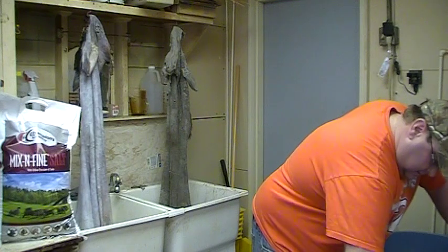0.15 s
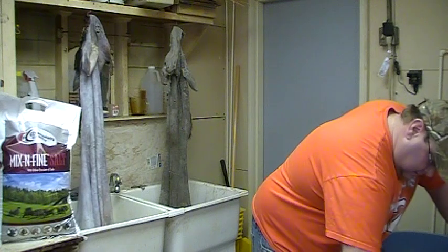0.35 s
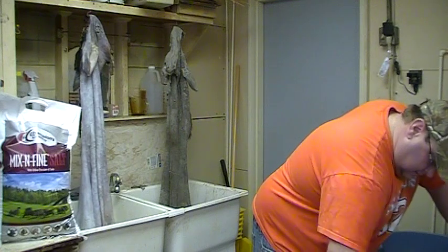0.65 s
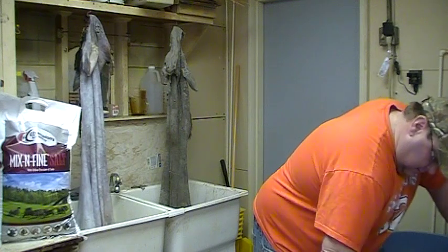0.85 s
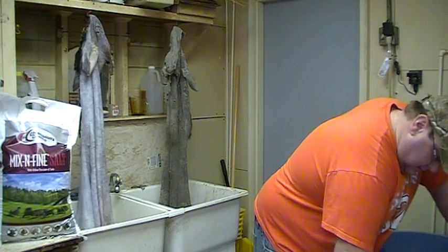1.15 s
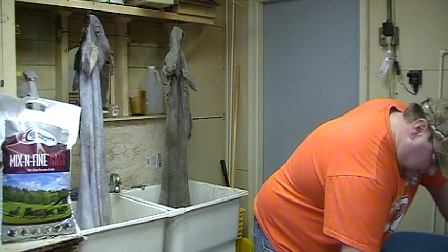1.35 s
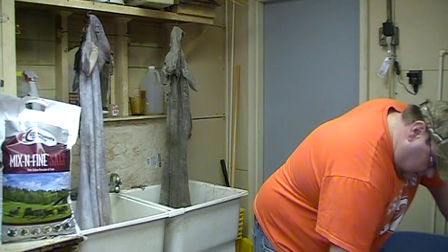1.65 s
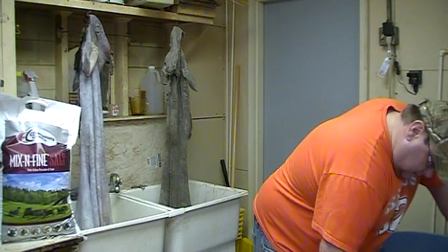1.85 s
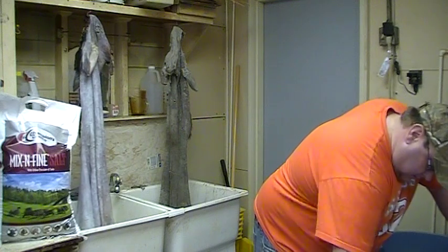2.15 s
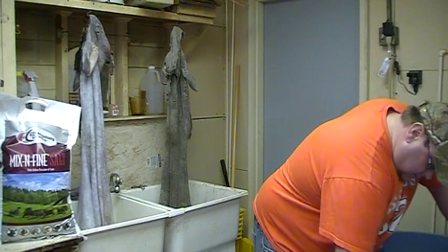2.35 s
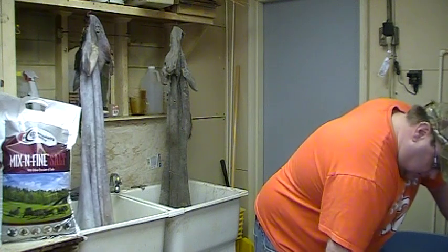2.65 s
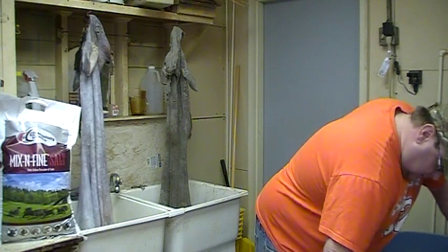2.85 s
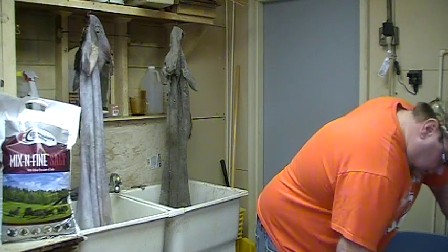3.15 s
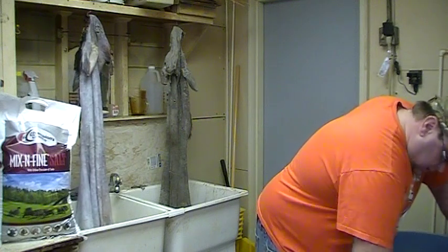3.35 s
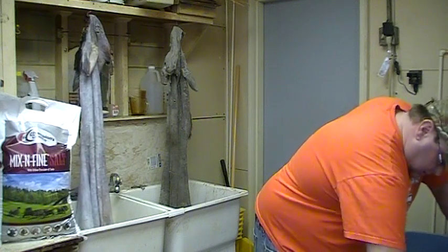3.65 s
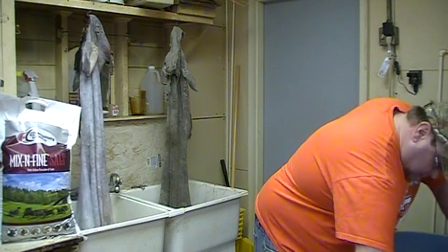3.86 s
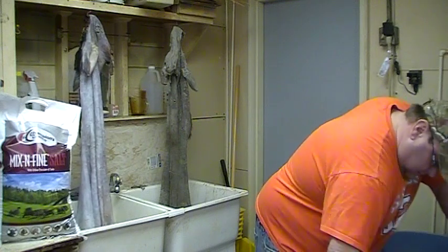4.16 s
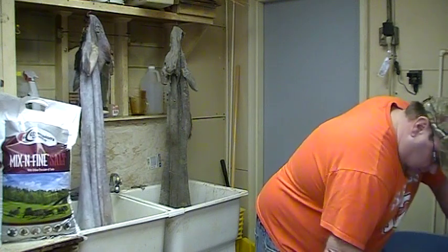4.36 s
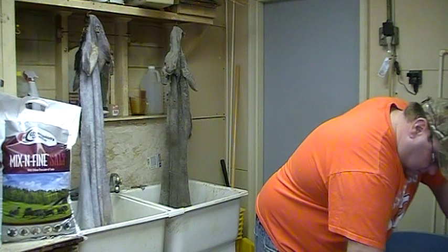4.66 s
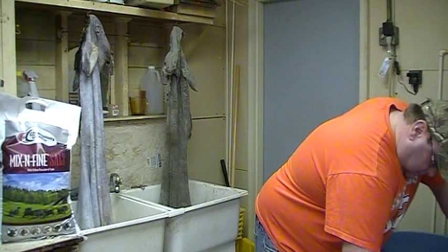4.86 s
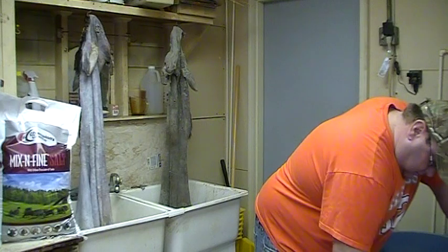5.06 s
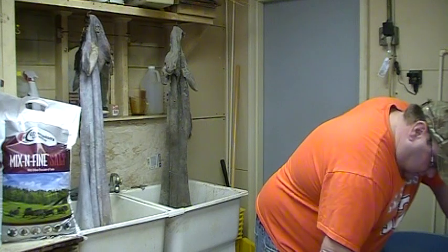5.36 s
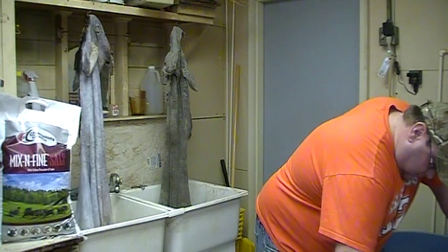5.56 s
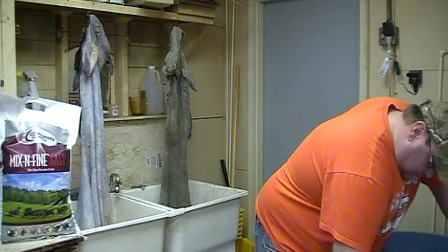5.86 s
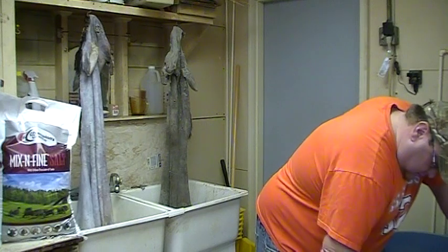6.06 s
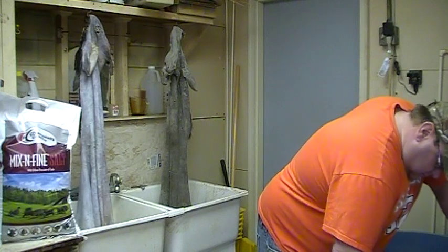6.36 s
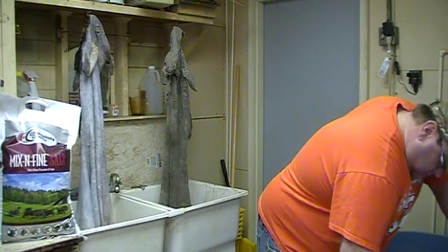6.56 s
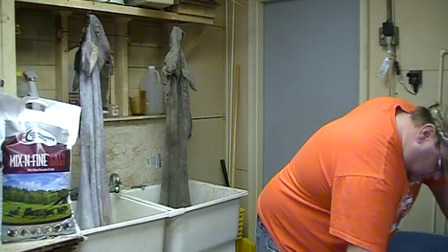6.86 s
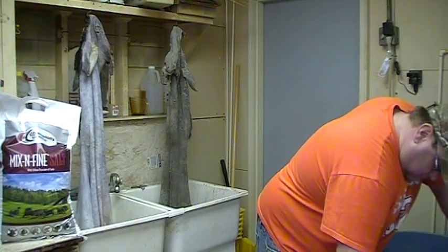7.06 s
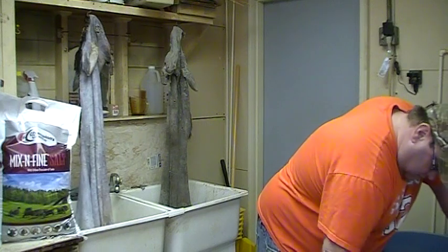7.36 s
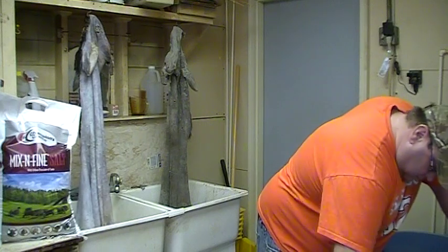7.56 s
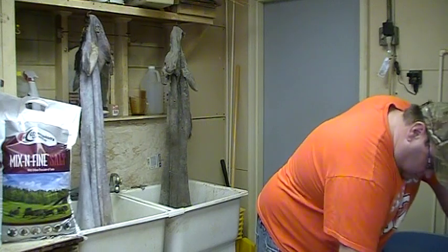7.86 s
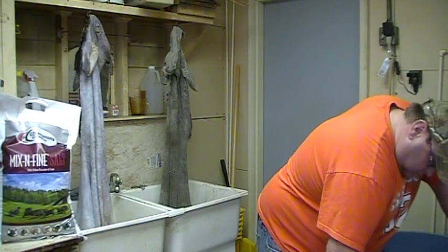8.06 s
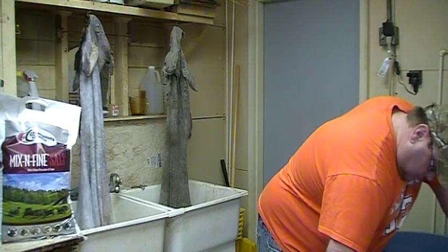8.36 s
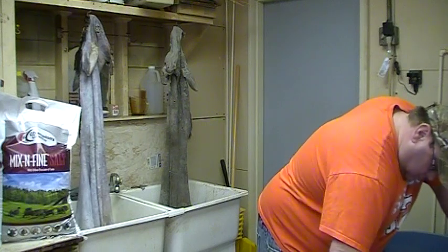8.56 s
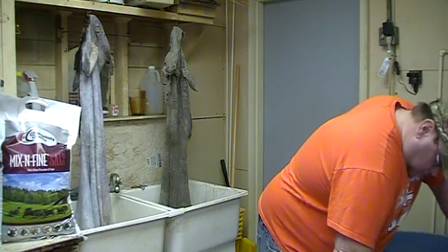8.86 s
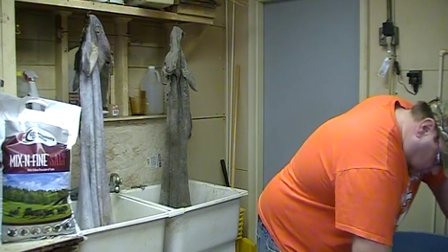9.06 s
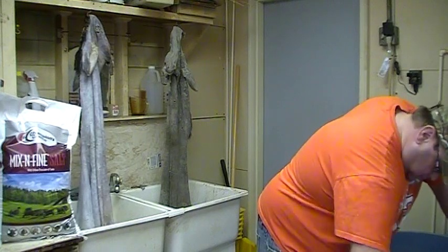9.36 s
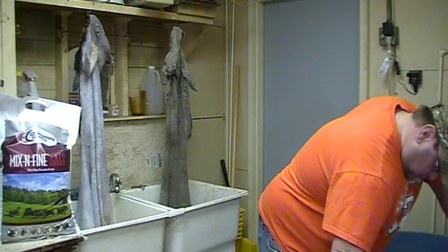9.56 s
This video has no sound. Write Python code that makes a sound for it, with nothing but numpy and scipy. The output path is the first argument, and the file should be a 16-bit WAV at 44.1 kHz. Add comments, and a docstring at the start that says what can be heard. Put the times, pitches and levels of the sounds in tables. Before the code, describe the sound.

Continuous hand stirring of a bucket of water: each stroke brings a foamy rush with a fine spray crackle, then rounded plops and low gurgles as air pockets close. Slaps against the plastic and tiny drop pings are scattered between, strongest near the middle and again late on. Heard close and mono, in a small hard-walled workroom with short reflections and a quiet noise floor.

```python
"""Stirring salt water in a bucket

A wooden stick stirs salt water in a plastic bucket in a small workshop. Strokes churn bubble swarms and
throw spray; air pockets close as chirping plops and deep gulps; noise bursts slap the wall, drops tick.
Air modes of the bucket and short diffuse echoes ring over a faint hiss and hum."""
import sys
import numpy as np
from scipy import signal
from scipy.fft import rfft, irfft, next_fast_len
from scipy.io import wavfile
from scipy.ndimage import uniform_filter1d, map_coordinates

SR = 44100
rng = np.random.default_rng(int(sys.argv[2]) if len(sys.argv) > 2 else 0)


def digitize_waveform(pressure):
    """Quantize a signal to 16-bit integers and store it at the path in sys.argv[1].

    Rows of a 2-D input are taken as channels; values are limited to [-1, 1].
    """
    field = np.atleast_2d(pressure).T
    bounded = np.clip(field, -1, 1)
    quanta = np.round(bounded * 32767).astype(np.int16)
    wavfile.write(sys.argv[1], SR, quanta)


N = 428652

# All dB levels are relative; the layer gains below and the mix apply on top.
# Spectra. Each row: frequency in Hz, level in dB per Hz.
FLOOR_SPECTRUM = [(20, -24), (45, -28), (58, -14), (75, -20), (130, -5), (400, -2), (1500, 2.5),
                  (6000, -34), (11000, -28), (16000, -40)]
CHURN_SPECTRUM = [(150, -60.5), (300, -7.5), (420, -5), (550, -4), (800, 2), (1300, -1), (2050, -2),
                  (2600, -10.5), (4000, -12.5), (7000, -20.5), (15000, -64)]
SPRAY_SPECTRUM = [(900, -28.5), (2500, 1), (4000, -1), (5500, -1), (7500, -2.5), (9800, 0.5), (12000, 1),
                  (14000, -3.5), (16000, -8.5)]
HEAVE_SPECTRUM = [(40, -57.5), (80, -31), (112, -4), (200, -2.5), (300, -2.5), (500, -2.5), (900, -42),
                  (3000, -43)]
SLAP_SPECTRUM = [(150, -24.5), (500, -7), (900, 6.5), (1800, 1), (2600, 0), (4000, -12), (7000, -8),
                 (15000, -23)]
THUD_SPECTRUM = [(40, -58), (80, -59), (115, -1), (200, -2), (300, -4), (400, -5), (600, -7.5), (900, -12),
                 (2500, -47), (8000, -50)]
# Workshop decay. Each row: frequency in Hz, T60 in seconds.
ROOM_DECAY = [(120, 0.62), (700, 0.17), (3000, 0.22), (12000, 0.16)]
# Air modes of the bucket and the corner it stands in. Each row: frequency in Hz, width in Hz, level in dB.
BUCKET_MODES = [(138, 8.6, -6), (182.4, 12.4, -3.5), (408, 53, -1), (505, 23, 5.5), (644.6, 29, 5),
                (742, 11, 4), (760, 22, -1), (885, 50, 0), (1134, 29, -0.5), (1390, 46, 0.5)]
# Water slapping the wall. Each row: start in seconds, peak in dB.
WALL_SLAPS = [(0.9654, -18), (1.3884, -12), (1.6716, -18), (2.3934, -11), (2.6377, -25), (2.8105, -11.5),
              (3.3503, -20), (4.4737, -20), (4.6588, -17), (4.7664, -9), (4.7751, -4), (6.0542, -11),
              (6.3921, -20.5), (6.8688, -24), (7.1613, -20.5), (7.1807, -13.5), (7.7413, -15.5),
              (8.075, -5.5), (8.114, -9.5), (8.3973, -17), (9.046, -13), (9.4528, -15)]
# Flung drops landing. Each row: start in seconds, peak in dB, start pitch of the trapped bubble in Hz.
LANDING_DROPS = [(0.289, -8.5, 5100), (0.5932, -13, 8550), (1.4257, -13, 11500), (1.6718, -16.5, 3520),
                 (1.7913, -16.5, 3520), (2.6384, -21, 3460), (2.7818, -17, 12300), (3.3465, -14, 10900),
                 (4.2097, -21, 4680), (4.4808, -14.5, 4560), (4.6573, -12, 3800), (5.1007, -9.5, 11600),
                 (5.3981, -12, 4200), (6.3916, -21, 5740), (7.1806, -22, 8500), (8.076, -12, 3850),
                 (8.9443, -16, 11600), (9.2794, -13.5, 9500)]
# Hollow behind the stick collapsing. Each row: start in seconds, peak in dB.
COLLAPSES = [(0.175, -19), (0.966, -13), (0.986, -14.5), (1.35, -20.5), (1.674, -14.5), (2.397, -24),
             (2.804, -23), (3.945, -15), (4.471, -16), (4.741, -14.5), (5.295, -20), (6.021, -12.5),
             (6.869, -14), (6.909, -24), (7.76, -13), (8.101, -11), (8.395, -15.5), (8.65, -10.5),
             (8.96, -14), (9.453, -16)]
# Air pockets closing. Each row: start in seconds, peak in dB, nominal pitch in Hz.
AIR_POCKETS = [(0.001, -6, 872), (0.089, -12, 557), (0.175, -9, 640), (0.464, -15, 1140), (0.693, -12, 690),
               (0.83, -11, 920), (0.91, -13, 490), (0.964, -0.5, 680), (1.349, -5, 493), (1.444, -10, 1090),
               (1.686, -11.5, 2020), (1.859, -17.5, 1110), (1.996, -12.5, 713), (2.213, -14, 693),
               (2.554, -11, 1450), (2.638, -11.5, 1520), (3.081, -15, 890), (3.614, -6.5, 1900),
               (3.704, -10.5, 1510), (3.722, -6, 1620), (3.775, -6, 790), (3.853, -18, 1380),
               (3.991, -12, 1530), (4.095, -15, 736), (4.104, -10, 1430), (4.362, -9.5, 640),
               (4.518, -7, 1870), (4.564, -2.5, 1186), (4.598, -10.5, 2160), (5.481, -13, 1730),
               (5.753, -11.5, 860), (5.892, -9.5, 787), (6.87, -3, 670), (7.181, -7.5, 1006),
               (7.597, -9, 720), (7.62, -1, 692), (7.741, -8, 880), (8.073, -4, 970), (8.398, -16.5, 656),
               (8.52, -14.5, 2240), (8.647, -8, 652), (9.043, -11, 1360), (9.455, -8, 474)]
# Water pushed by the stick. Each row: crest in seconds, rise in seconds, hold in seconds,
# churned air in dB, spray in dB, heaving water in dB.
STICK_SURGES = [(0, 0.01, 0.0072, -22, -32.5, -41), (0.152, 0.087, 0.047, -22.5, -23.5, -51),
                (0.277, 0.017, .005, -27.5, -36, -52), (0.417, 0.11, 0.29, -33, -35, -66),
                (1, 0.15, 0.073, -26, -27.5, -43), (1.156, 0.069, 0.057, -27, -34, -36),
                (1.382, 0.11, .11, -25, -26.5, -34.5), (1.659, 0.013, 0.033, -28.5, -35.5, -39),
                (1.792, 0.027, 0.017, -30, -34.5, -44), (2.029, 0.022, .02, -27.5, -39, -34),
                (2.22, 0.077, 0.042, -32, -56, -35), (2.307, 0.034, 0.018, -27, -32.5, -35),
                (2.406, 0.022, 0.014, -29.5, -34.5, -34), (2.545, .012, 0.018, -29, -38.5, -37),
                (2.656, 0.0091, 0.036, -29, -38, -58), (2.806, .03, 0.016, -36, -34.5, -31.5),
                (3.073, 0.022, 0.2, -31.5, -44, -54), (3.378, 0.031, 0.1, -24, -26.5, -32.5),
                (3.563, .07, 0.022, -26, -30.5, -33), (3.725, .06, 0.029, -31.5, -36, -47),
                (3.846, 0.032, 0.018, -32, -36, -42.5), (3.967, 0.046, 0.14, -29.5, -33, -36),
                (4.282, 0.065, 0.033, -25, -31, -32.5), (4.368, 0.034, 0.017, -25, -28, -31),
                (4.644, 0.16, 0.048, -25.5, -30, -50), (4.762, 0.045, 0.012, -23, -32.5, -46),
                (4.885, .02, .02, -27.5, -34.5, -58), (5.07, 0.085, 0.26, -25.5, -30, -42.5),
                (5.5, 0.12, 0.18, -27, -31.5, -48), (5.77, 0.058, 0.14, -29, -28.5, -52),
                (6.058, 0.074, 0.065, -23.5, -30.5, -52), (6.599, 0.078, 0.018, -28, -33.5, -55),
                (6.86, 0.24, 0.059, -23, -30, -39), (7.205, 0.039, 0.17, -29.5, -33, -48),
                (7.487, 0.017, .01, -38, -40, -52.5), (7.6, 0.058, 0.15, -25.5, -31.5, -58),
                (7.87, 0.025, 0.098, -31, -44, -32), (8.072, 0.03, 0.11, -26.5, -34.5, -45),
                (8.24, 0.036, 0.0086, -33, -52, -32), (8.35, 0.026, 0.015, -35, -38, -39),
                (8.682, 0.073, 0.051, -26.5, -31.5, -37), (8.952, 0.054, 0.018, -33.5, -40, -44),
                (9.044, 0.044, 0.12, -28.5, -33.5, -35.5), (9.24, 0.042, 0.06, -28.5, -33.5, -29),
                (9.566, 0.1, 0.069, -21, -26.5, -27.5)]

TOP_HZ = 15850
SLAP_DB, SLAP_T60_S = -6, 0.063
DROP_DB, DROP_T60_S = -8.5, 0.07
PING_DB, PING_CYCLES = 1.5, 39
GULP_RUN_S, GULP_DB, THUD_DB, THUD_T60_S = 0.055, -3, -6, 0.22
PLOP_DB, SPLIT_DB = 0.5, -7.5  # a pocket and the smaller one it splits off
PLOP_CYCLES_AT_1KHZ, PLOP_RISE, PLOP_ONSET_CYCLES = 27, 0.21, 1.6  # rise: share of pitch over a life
STRAY_LOW_HZ, STRAY_HIGH_HZ, STRAY_OVER_CHURN_DB = 652, 2250, 8  # nominal, as in AIR_POCKETS
CHURN_FALL_DB_PER_S, SPRAY_FALL_DB_PER_S, HEAVE_FALL_DB_PER_S = 107, 97.5, 106
SWIRL_DB, FIZZ_DB, SWAY_DB = -38.5, -41, -52.5  # churn, spray and heave kept up between surges
WAKE_OVER_GULP_DB, WAKE_RISE_S, WAKE_HOLD_S = -23, 0.0067, 0.01  # heaving left by a gulp


def amp(db):
    """Decibels to gain."""
    return 10 ** (np.asarray(db) / 20)


def unit(x):
    """Scale to rms 1."""
    return x / np.sqrt(np.mean(x ** 2) + 1e-20)


def along(points, hz):
    """(Hz, value) points read on a log frequency axis."""
    f, v = np.transpose(points)
    return np.interp(np.log(hz + 1), np.log(f + 1), v)


def filtered(x, response):
    """Multiply the spectrum of x by a complex response of frequency."""
    m = next_fast_len(N + SR // 2)
    return irfft(rfft(x, m) * response(np.fft.rfftfreq(m, 1 / SR)), m)[:N]


def coloured(x, spectrum):
    """Minimum-phase filter of unit energy, built from the folded cepstrum of the spectrum."""
    size = 4096
    cepstrum = irfft(np.log(amp(along(spectrum, np.fft.rfftfreq(size, 1 / SR)))))
    fold = np.r_[1, np.full(size // 2 - 1, 2), 1, np.zeros(size // 2 - 1)]
    kernel = irfft(np.exp(rfft(cepstrum * fold)))
    return signal.fftconvolve(x, kernel / np.linalg.norm(kernel))[:N]


def add(track, s, sound):
    """Mix a sound into the track at s seconds."""
    start = int(np.clip(round(s * SR), 0, N - 1))
    track[start:start + len(sound)] += sound[:N - start]


def wobble(count):
    """Smooth random curve with count knots a second."""
    knots = rng.standard_normal(N * count // SR + 4)
    return map_coordinates(knots, [np.arange(N) * count / SR])


def bubble(cycle, life, rise, onset):
    """Damped sine over its cycle count: -60 dB after life cycles, rising in pitch as it nears the surface."""
    age = cycle / life
    tone = np.sin(2 * np.pi * cycle * (1 + rise * age / 2))
    return tone * amp(-60 * age) * (1 - np.exp(-cycle / onset))


def swarm(low_hz, high_hz, life, spread_db, count, size):
    """Bubbles of size samples at random times, pitches, strengths and dampings, rms 1."""
    when, pitch, strength, damping = rng.random((count, 4)).T[:, :, None]
    hz = low_hz * (high_hz / low_hz) ** pitch
    k = np.arange(size)
    # small bubbles are brief but sharp
    gain = amp(-spread_db * np.log(np.maximum(strength, 0.01))) * hz / high_hz
    fade_out = np.minimum(1, 10 * (1 - k / size))
    rings = gain * bubble(hz * k / SR, life * (0.5 + damping), rise=0.27, onset=0.31) * fade_out
    at = (when * N).astype(int) + k
    return unit(np.bincount(at.ravel(), rings.ravel(), N)[:N])


def levelled(x, size):
    """Even out the slow swings of a swarm over size samples; keep its grain."""
    return x / np.sqrt(np.abs(uniform_filter1d(x ** 2, size)) + 0.0072)


def echoes(x, decay, count, size):
    """Diffuse noise tails of size samples, dying by band, redrawn for each of count stretches as water moves."""
    hop = N // count + 1
    padded = np.pad(x, (hop, 2 * hop))
    pieces = np.lib.stride_tricks.sliding_window_view(padded, 2 * hop)[::hop]
    pieces = pieces * np.sin(np.pi * np.arange(2 * hop) / (2 * hop))
    hz, t, z = signal.stft(rng.standard_normal((len(pieces), size)), SR, nperseg=256)
    tails = signal.istft(z * amp(-60 * t / along(decay, hz)[:, None]), SR, nperseg=256)[1]
    tails /= np.linalg.norm(tails, axis=1, keepdims=True)
    out = np.zeros(N + 4 * hop + 2 * size)
    for k, answer in enumerate(signal.fftconvolve(pieces, tails, axes=1)):
        out[k * hop:k * hop + len(answer)] += answer
    return out[hop:hop + N]


def hiss_and_hum():
    """Steady coloured noise and a faint 59 Hz sine."""
    hiss = amp(-44.5) * coloured(rng.standard_normal(N), FLOOR_SPECTRUM)
    hum = amp(-69) * np.sin(2 * np.pi * 59 * np.arange(N) / SR)
    return hiss + hum


def workshop(x):
    """The near walls answer 5 ms later with a short diffuse tail."""
    return np.pad(echoes(x, ROOM_DECAY, count=70, size=14000), (SR // 200, 0))[:N]


def bucket(x):
    """The water excites the air modes above it: parallel resonators added to the direct sound."""
    def modes(f):
        return sum(amp(db) * 1j * f * width / (centre * centre - f * f + 1j * f * width)
                   for centre, width, db in BUCKET_MODES)
    return filtered(x, lambda f: amp(-3) * (1 + amp(-3.5) * modes(f)))


def splashes():
    """Water slaps the wall as noise bursts; drops land with a bright tick and a tiny bubble's ping."""
    slaps, drops, pings = np.zeros((3, N))
    t = np.arange(SR // 6) / SR
    for s, db in WALL_SLAPS:
        envelope = amp(db + SLAP_DB - 60 * t / SLAP_T60_S) * (1 - np.exp(-t / 0.0003))
        add(slaps, s, envelope * rng.standard_normal(len(t)))
    for s, db, hz in LANDING_DROPS:
        add(drops, s, amp(db + DROP_DB - 60 * t / DROP_T60_S) * rng.standard_normal(len(t)))
        add(pings, s, amp(db + PING_DB) * bubble(hz * t, life=PING_CYCLES, rise=0.45, onset=0.96))
    return coloured(slaps, SLAP_SPECTRUM) + coloured(drops, SPRAY_SPECTRUM) + pings


def gulps():
    """A collapsing hollow thuds and sheds a run of ever larger, deeper and fainter air pockets."""
    pockets, thuds = np.zeros((2, N))
    t = np.arange(SR // 5) / SR
    steps = np.linspace(0, 1, num=8)
    for s, db in COLLAPSES:
        add(thuds, s, amp(db + THUD_DB - 60 * t / THUD_T60_S) * rng.standard_normal(len(t)))
        for step, (late, detune) in zip(steps, rng.standard_normal((len(steps), 2))):
            hz = 480 * (125 / 480) ** step * np.exp(0.074 * detune)
            ring = bubble(hz * t, life=12, rise=0.35, onset=0.5)
            start = s + GULP_RUN_S * step * (1 + 0.1506 * late)
            add(pockets, start, amp(db + GULP_DB - 19.4 * step) * ring)
    return pockets + coloured(thuds, THUD_SPECTRUM)


def strays(churn_db, count):
    """Further pockets at random moments, as strong as the churning then: rows as in AIR_POCKETS."""
    rows = []
    for when, pitch in rng.random((count, 2)):
        db = churn_db[int(when * N)] + STRAY_OVER_CHURN_DB
        rows.append((when * N / SR, db, STRAY_LOW_HZ * (STRAY_HIGH_HZ / STRAY_LOW_HZ) ** pitch))
    return rows


def plops(churn_db):
    """Each air pocket rings at its own pitch, chirping upward, and splits off a smaller, higher one."""
    out, t = np.zeros(N), np.arange(SR // 8) / SR

    def ring(hz):
        life = PLOP_CYCLES_AT_1KHZ * np.sqrt(hz / 1000)
        return bubble(hz * t, life=life, rise=PLOP_RISE, onset=PLOP_ONSET_CYCLES)

    pockets = list(AIR_POCKETS) + strays(churn_db, count=60)
    for (s, db, hz), (late, smaller) in zip(pockets, rng.random((len(pockets), 2))):
        add(out, s, amp(db + PLOP_DB) * ring(0.963 * hz))
        split = ring(hz * (1.2 + 0.16 * smaller))
        add(out, s + 0.006 + 0.021 * late, amp(db + SPLIT_DB) * split)
    return out


def surge(s, rise, hold, fall_db_per_s):
    """Power of one surge: swells to its crest at s, holds, dies away; one point per SR // 1000 samples."""
    t = np.arange(0, N, SR // 1000) / SR - s
    swell = np.exp(-2 * (np.minimum(t, 0) / rise) ** 2)
    return swell * amp(-fall_db_per_s * np.maximum(t - hold, 0)) ** 2


def agitation():
    """Surges and gulp wakes add in power to the circling water: dB of churning, spray and heaving."""
    churn, spray, heave = amp(SWIRL_DB) ** 2, amp(FIZZ_DB) ** 2, amp(SWAY_DB) ** 2
    for s, rise, hold, churn_db, spray_db, heave_db in STICK_SURGES:
        churn = churn + amp(churn_db) ** 2 * surge(s, rise, hold, CHURN_FALL_DB_PER_S)
        spray = spray + amp(spray_db) ** 2 * surge(s, rise, hold, SPRAY_FALL_DB_PER_S)
        heave = heave + amp(heave_db) ** 2 * surge(s, rise, hold, HEAVE_FALL_DB_PER_S)
    for s, db in COLLAPSES:
        wake = surge(s + WAKE_RISE_S, WAKE_RISE_S, WAKE_HOLD_S, HEAVE_FALL_DB_PER_S)
        heave = heave + amp(db + WAKE_OVER_GULP_DB) ** 2 * wake
    points = np.arange(0, N, SR // 1000)
    return [np.interp(np.arange(N), points, 10 * np.log10(power)) for power in (churn, spray, heave)]


def stirring(churn_db, spray_db, heave_db):
    """The stick drags air under, tears off spray, heaves water: returns (distinct grains, blended wash)."""
    lapping = wobble(count=22)  # wavelets make every surge uneven
    churn_db = churn_db + 0.7 * lapping
    spray_db = spray_db + 0.6 * lapping + 0.8 * wobble(count=45)

    def rush(spectrum):
        return unit(coloured(rng.standard_normal(N), spectrum))

    bubbles = swarm(416, 3906, life=13, spread_db=1, count=3200, size=800)
    bubbles = levelled(unit(coloured(bubbles, CHURN_SPECTRUM)), size=2000)
    crackle = swarm(2420, 13600, life=5.2, spread_db=8, count=7000, size=80)
    crackle = levelled(unit(coloured(crackle, SPRAY_SPECTRUM)), size=2500)
    pockets = swarm(95.8, 686, life=15.2, spread_db=1.5, count=1400, size=2400)
    heave = levelled(unit(coloured(pockets, HEAVE_SPECTRUM)), size=2000)
    grains = amp(churn_db - 2.5) * bubbles + amp(spray_db - 3) * crackle
    # countless tiny bubbles merge into a smooth wash
    wash = amp(churn_db - 5.5) * rush(CHURN_SPECTRUM) + amp(spray_db + 0.5) * rush(SPRAY_SPECTRUM)
    return grains, wash + amp(heave_db + 0.5) * heave


def scene():
    """Distinct sounds bounce in bucket and room; the wash is diffuse already; hiss and hum lie underneath."""
    churn_db, spray_db, heave_db = agitation()
    grains, wash = stirring(churn_db, spray_db, heave_db)
    distinct = grains + plops(churn_db) + gulps() + splashes()
    bounces = echoes(distinct, [(200, 0.074), (10000, 0.081)], count=400, size=3000)  # (Hz, T60 s)
    room = workshop(distinct)
    water = bucket(amp(-1) * distinct + amp(-1) * bounces + amp(-3) * room + wash)
    return (water + hiss_and_hum())[None]


def record(dry):
    """Thin the deepest bass with a 48 Hz high-pass; keep nothing from TOP_HZ up."""
    thinned = signal.sosfilt(signal.butter(3, 48, "highpass", fs=SR, output="sos"), dry)
    return np.array([filtered(channel, lambda hz: hz < TOP_HZ) for channel in thinned])


dry = scene()
out = record(dry)
digitize_waveform(out)
```